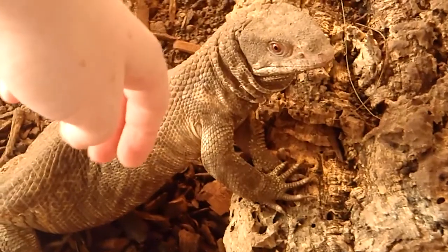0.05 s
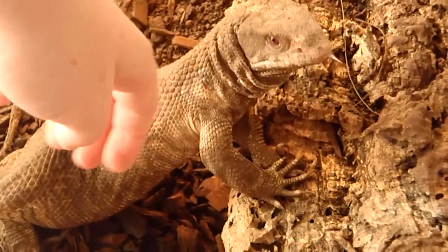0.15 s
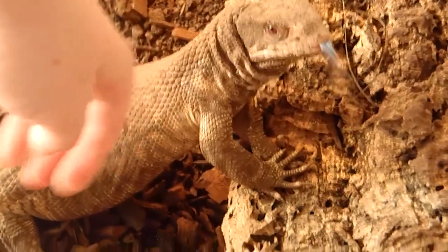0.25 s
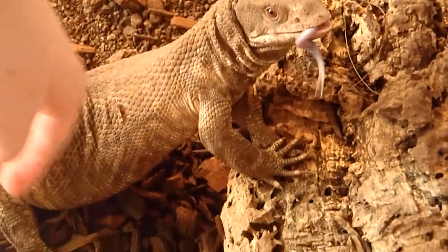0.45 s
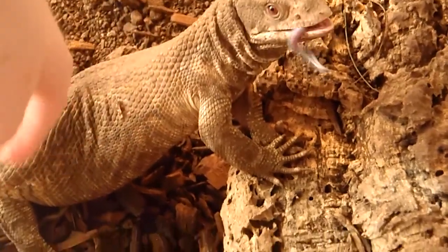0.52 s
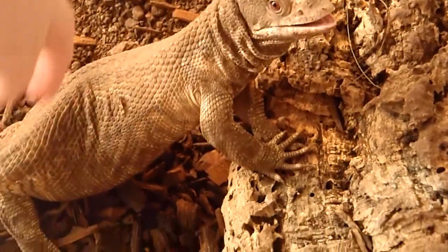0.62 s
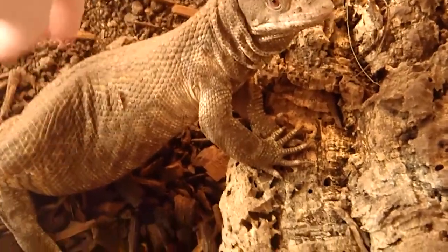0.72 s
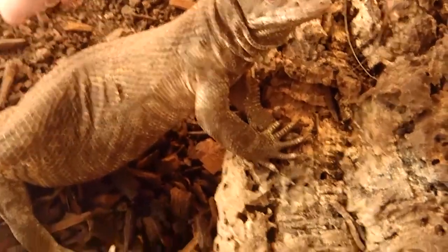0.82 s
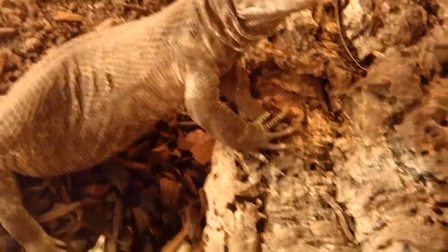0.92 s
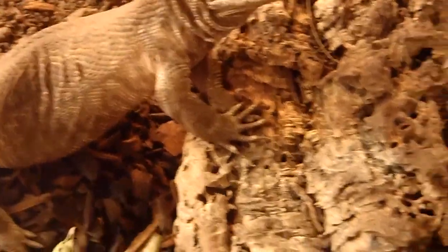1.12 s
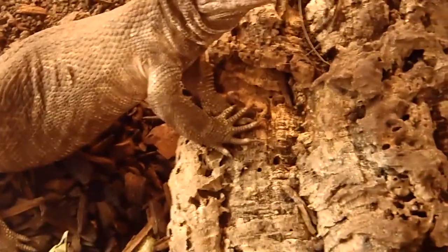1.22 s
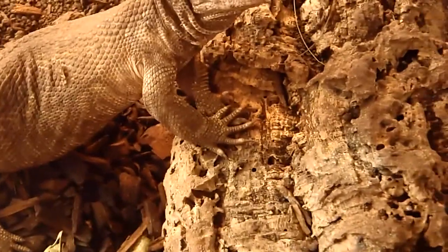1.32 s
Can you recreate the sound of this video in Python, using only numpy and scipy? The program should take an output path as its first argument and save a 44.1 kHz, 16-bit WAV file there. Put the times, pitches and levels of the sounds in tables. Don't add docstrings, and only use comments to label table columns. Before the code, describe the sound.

A cricket chirps twice in a hard-walled room, each chirp two quick high strokes with a ringing tail. Low finger bumps knock the microphone, then two faint claw scuffs on bark follow, over steady hiss.

```python
import sys
import numpy as np
from scipy import signal
from scipy.fft import rfft, irfft
from scipy.io import wavfile
from scipy.ndimage import uniform_filter1d

SR = 44100
rng = np.random.default_rng(int(sys.argv[2]) if len(sys.argv) > 2 else 0)


def store_pcm(level_fs):
    pcm = np.round(np.clip(level_fs, -1, 1) * 32767).astype(np.int16)
    wavfile.write(sys.argv[1], SR, np.atleast_2d(pcm).T)


def voltage_ratio(level):
    return 10 ** (np.asarray(level, float) / 20)


N = 59535


def evened(x):
    return x / np.sqrt(np.mean(x ** 2) + 1e-20)


def read(points, hz):
    f, value = np.transpose(points)
    return np.interp(np.log(hz + 1), np.log(f + 1), value)


def add(mix, start_s, sound):
    part = mix[round(start_s * SR):][:len(sound)]
    part += sound[:len(part)]


# f/Hz, level/dB
HISS_SPECTRUM = [(15, -41), (25, 2.5), (239, -4.5), (312, -3), (452, -0.5), (517, -1.5), (812, -3),
                 (2230, -8), (14300, -14.5)]
HISS_DB, PATCH_DB, RUMBLE_PATCH_DB = -54, 0.73, 2
FAR_HZ, FAR_WIDTH_HZ, FAR_DB = 4630, 870, -65


def air():
    frames = N // 256 + 5
    hz = np.fft.rfftfreq(1024, 1 / SR)[:, None]
    a, b, c, d, patch = rng.standard_normal((frames, 513, 5)).T
    patch = evened(uniform_filter1d(uniform_filter1d(patch, 8, 0), 8, 1))
    patch_db = PATCH_DB + RUMBLE_PATCH_DB / (1 + (hz / 250) ** 2)
    hiss_bins = (a + 1j * b) * voltage_ratio(read(HISS_SPECTRUM, hz) + patch * patch_db)
    far_bins = (c + 1j * d) * np.exp(-2 * ((hz - FAR_HZ) / FAR_WIDTH_HZ) ** 2)
    hiss = evened(signal.istft(hiss_bins, nperseg=1024, noverlap=768)[1][:N])
    far = evened(signal.istft(far_bins, nperseg=1024, noverlap=768)[1][:N])
    return voltage_ratio(HISS_DB) * hiss + voltage_ratio(FAR_DB) * far


# t/s, signed push/full scale, f/Hz, ring T60/s
BUMPS = [(0.036, .004, 143, 0.026), (.238, 0.014, 310, 0.0077), (.244, 0.0046, 166, 0.029),
         (0.276, 0.0051, 220, 0.014), (.289, 0.009, 200, 0.014), (0.2932, -0.028, 230, 0.015),
         (0.355, 0.0022, 140, .02), (0.5499, 0.028, 325, 0.014), (0.5549, 0.023, 384, 0.0074),
         (0.55, -0.0053, 86, 0.055), (0.5795, 0.011, 164, 0.021), (0.676, 0.0056, 285, 0.012),
         (0.6832, -0.0086, 258, 0.012), (1.223, 0.0015, 80.5, 0.076), (1.236, 0.0059, 304.5, 0.0075),
         (.015, 0.00037, 34.8, .12), (0.461, 0.0016, 40, .1), (.635, 0.0021, 45, 0.094),
         (0.994, 0.0022, 109, 0.059), (1.325, 0.00028, 85, 0.076)]
MIC_LOW_HZ, HOUSING_HZ = 49, 610


def bumps():
    out, t = np.zeros(N), np.arange(4000) / SR
    for start_s, push, hz, t60_s in BUMPS:
        onset = np.minimum(t * hz * 3, 1)
        ring = voltage_ratio(-60 * t / t60_s) * np.sin(2 * np.pi * hz * t)
        add(out, start_s, 2 * push * onset * ring)
    return signal.lfilter(*signal.butter(2, [MIC_LOW_HZ, HOUSING_HZ], "band", fs=SR), out)


# t/s, level/dB, hold/s, fade T60/s
SCUFFS = [
    (1.0615, -46.5, 0.0081, 0.15),
    (1.1800, -46, 0.0086, 0.16),
]
# f/Hz, level/dB
BARK = [(150, -9.5), (400, -10), (1600, -7), (2300, -11.5), (4000, -4.5), (6300, -11.5), (7600, -10),
        (14500, -31)]
GRIT_DB, GRIT_PER_S = 2.0, 15000
SNAP_DB, SNAP_S = 5.0, 0.002


def scuffs():
    out, t = np.zeros(N), np.arange(6000) / SR
    colour = voltage_ratio(read(BARK, np.fft.rfftfreq(len(t), 1 / SR)))
    for start_s, db, hold_s, t60_s in SCUFFS:
        struck = rng.random(len(t)) < GRIT_PER_S / SR
        clicks = voltage_ratio(GRIT_DB * rng.exponential(1, len(t))) * struck
        clicks = clicks * rng.choice([-1, 1], len(t))
        grit = evened(irfft(rfft(clicks) * colour, len(t)))
        late_s = np.maximum(t - hold_s, 0)
        snap_db = SNAP_DB * np.exp(-t / SNAP_S)
        fade_db = -60 * late_s / t60_s - 4.8 * np.minimum(late_s / 0.0017, 1)
        add(out, start_s, voltage_ratio(db + snap_db + fade_db) * grit)
    return out


ROOM_T60_S, ROOM_BUILD_S = 0.55, 0.031


def room(echoes, tail_db):
    t = np.arange(SR) / SR
    build = np.minimum(t / ROOM_BUILD_S, 1) ** 2
    response = rng.standard_normal(SR) * voltage_ratio(-60 * t / ROOM_T60_S) * build
    response *= voltage_ratio(tail_db) / np.linalg.norm(response)
    for delay_s, db in echoes:
        add(response, delay_s, voltage_ratio(db) * np.ones(1))
    return response


END_HZ, FLOOR_HZ, SAG_HZ_PER_S = 4590, 4640, 28000
CATCH_HZ, CATCH_S = 280, 0.0018
TOOTH_WOBBLE, RASP_HZ = 0.002, (5150, 5700)
OPEN_SHARE, PEAK_SHARE, SWELL_WIDTH = 0.24, 0.52, 0.8
LINGER_S, END_S = 0.003, 0.0047


def stroke(top_hz, rasp_db):
    t = np.arange(1500) / SR
    length_s = (top_hz - END_HZ) / SAG_HZ_PER_S
    wobble = evened(uniform_filter1d(rng.standard_normal(1500), 90))
    hz = top_hz - SAG_HZ_PER_S * t + CATCH_HZ * np.exp(-t / CATCH_S)
    hz = hz * (1 + TOOTH_WOBBLE * wobble)
    hz = FLOOR_HZ + 60 * np.logaddexp(0, (hz - FLOOR_HZ) / 60)
    opening = np.minimum(t / (OPEN_SHARE * length_s), 1)
    swell = np.exp(-2 * (t / length_s - PEAK_SHARE) ** 2 / SWELL_WIDTH)
    closing = np.sin(np.pi / 2 * np.clip((length_s + LINGER_S - t) / END_S, 0, 1)) ** 2
    rasp_band = signal.butter(2, RASP_HZ, "band", fs=SR)
    rasp = evened(signal.lfilter(*rasp_band, rng.standard_normal(1500)))
    tone = np.sin(2 * np.pi * np.cumsum(hz) / SR)
    return opening * swell * closing * (tone + voltage_ratio(rasp_db) * rasp)


# t/s, level/dB, opening f/Hz, rasp level/dB, place/index
STROKES = [
    (.2235, -35.5, 5090, -37, 0),
    (.268, -34, 5100, -45, 0),
    (.908, -37, 4960, -27, 1),
    (0.95, -33.5, 5060, -33, 1),
    (.810, -65, 5100, -28, 1),
]
# delay t/s, level/dB
ECHOES = [
    [(0, -3), (.003, -3), (.008, 0), (.014, 1.5), (.020, 10), (.039, -8)],
    [(0, -4), (.0077, 4.5), (.014, -1), (.020, 4), (.040, -0.5), (.049, -23), (.058, 2)],
]
ROOM_DB = [7.5, 9.5]


def crickets():
    dry = np.zeros((len(ECHOES), N))
    for start_s, db, top_hz, rasp_db, place in STROKES:
        add(dry[round(place)], start_s, voltage_ratio(db) * stroke(top_hz, rasp_db))
    out = np.zeros(N)
    for strokes, echoes, tail_db in zip(dry, ECHOES, ROOM_DB):
        out += signal.fftconvolve(strokes, room(echoes, tail_db))[:N]
    return out


def scene():
    return (air() + bumps() + scuffs() + crickets())[None]


def top_cut(x):
    return signal.sosfilt(signal.butter(12, 15360, fs=SR, output="sos"), x)


EDGE_HZ = 14290


def record(dry):
    edge = signal.firwin(1023, EDGE_HZ, window=("kaiser", 9), fs=SR)[None]
    limited = signal.oaconvolve(dry, edge, "same")
    return top_cut(limited)


dry = scene()
out = record(dry)
store_pcm(out)
```